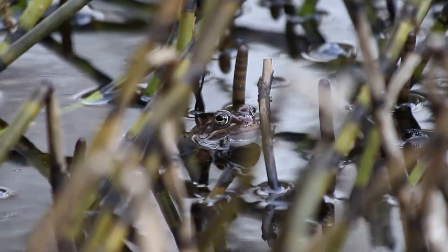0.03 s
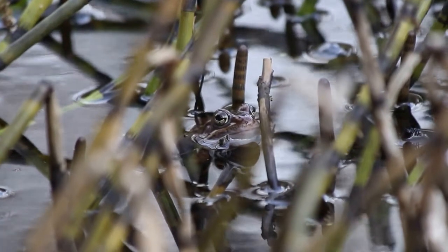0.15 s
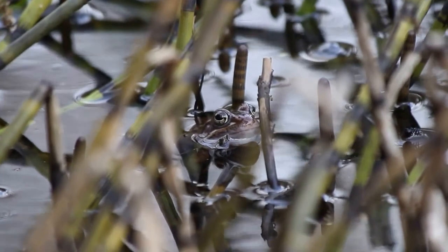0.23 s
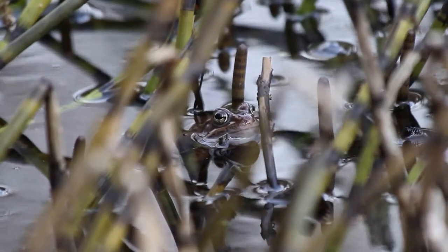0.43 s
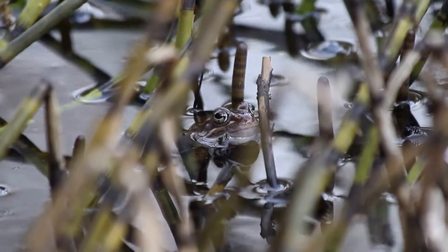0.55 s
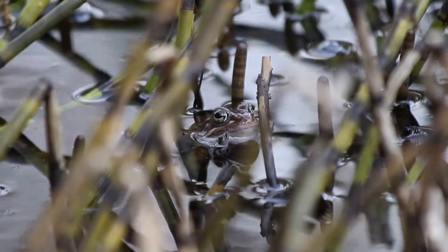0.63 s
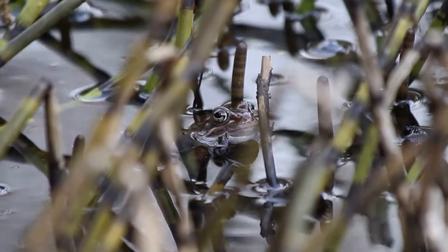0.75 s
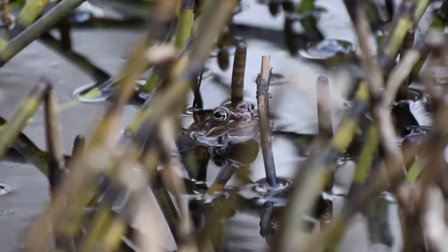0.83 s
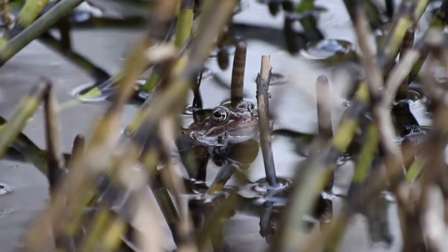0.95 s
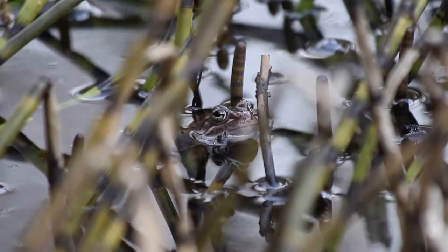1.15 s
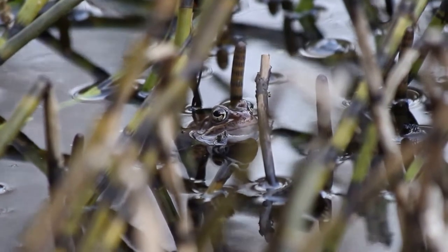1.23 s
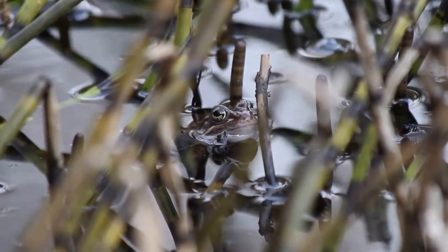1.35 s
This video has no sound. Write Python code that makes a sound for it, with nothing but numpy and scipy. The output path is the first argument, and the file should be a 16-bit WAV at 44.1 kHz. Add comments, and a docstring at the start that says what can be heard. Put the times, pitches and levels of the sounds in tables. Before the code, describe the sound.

Faint camera motor ticks, irregular and dry, over dull outdoor hush with one brief wind thump

```python
"""A small motor in a camera beside a still pond steps with faint, nearly identical ticks: each impulse sets
the same damped casing modes ringing, and weak random jolts ring them between steps. Under it lie a dull
outdoor wash of noise shaped by a spectral curve and casing resonances, and a very high steady sine whine.
Wind on the microphone is low band noise with separate thumps, each a pulse of about one cycle; two thin high
ticks are single damped tones, and faint far chirps, likely a bird, are short falling sines."""
import sys
import numpy as np
from scipy import signal
from scipy.fft import rfft, irfft
from scipy.io import wavfile
from scipy.ndimage import uniform_filter1d

SR = 44100
rng = np.random.default_rng(int(sys.argv[2]) if len(sys.argv) > 2 else 0)


def int16_out(signal):
    """Quantize to a 16-bit WAV file."""
    q = np.round(np.clip(np.atleast_2d(signal).T, -1, 1) * 32767)
    wavfile.write(sys.argv[1], SR, q.astype(np.int16))


def invert_db(level):
    """Linear amplitude ratio for a level in decibels (20 dB per decade), elementwise."""
    return 10 ** (np.asarray(level, dtype=float) / 20)


N = 61739  # length in samples


def rms_one(x):
    """Normalization: scales a signal to unit root-mean-square."""
    return x / np.sqrt(np.mean(x ** 2) + 1e-20)


def drift(rate_hz):
    """Low-pass random process: white noise through a double real pole gives a slow wander of rms 1."""
    pole = np.exp(-2 * np.pi * rate_hz / SR)
    white = rng.standard_normal(N + SR // 2)
    settled = signal.lfilter([1], [1, -2 * pole, pole * pole], white)[SR // 2:]
    return rms_one(settled)


def ring(hz, t60_s, swell_s):
    """Damped mode: a sine that swells with one time constant and decays by 60 dB in t60_s."""
    t = np.arange(SR // 10) / SR
    swell = (1 - np.exp(-t / max(swell_s, 1e-5))) ** 2
    decay = invert_db(-60 * t / t60_s)
    return swell * decay * np.sin(2 * np.pi * hz * t)


def add(out, start_s, sound):
    """Superposition: adds a sound into the mix from its start time."""
    i = max(int(start_s * SR), 0)
    out[i:i + len(sound)] += sound[:N - i]


def casing_modes():
    """Modal synthesis: the casing's impulse response, one damped tone per row."""
    # modes of the casing under a tick: pitch_hz, level_db (relative), t60_s, swell_s
    mode_table = [(1146, -9.5, 0.035, 0.0024), (1350, -13, .04, 0.00059), (2071, -9.5, 0.03, 0.0014),
                  (2466, 0, 0.011, 0.00034), (2786, 0, 0.019, 0.00073), (3430, -2, 0.017, 0.00088),
                  (4016, -12, 0.023, 0.00019), (4483, -14.5, 0.018, 0.00026), (6050, 9.5, 0.0077, 0.0027),
                  (6835, 8.5, 0.0087, .003), (7970, -27, 0.013, 0.00024), (9200, -23.5, 0.013, 0.00033),
                  (10800, -23.5, 0.0095, .0003), (12050, -20, 0.0096, .0003), (12450, -23, 0.013, .0003),
                  (13700, -29, 0.0088, .0002), (5380, -23.5, 0.02, 0.00028), (7600, -29.5, 0.0094, .0002)]
    return np.array([invert_db(level_db) * ring(hz, t60_s, swell_s) for hz, level_db, t60_s, swell_s in mode_table])


def wash():
    """Spectral shaping: white noise filtered to a curve plus resonances, its level flickering a little."""
    level_db, flicker_db, flicker_hz = -58, 1.14, 40
    # spectrum under the resonances, with a narrow gap near 14.8 kHz: pitch_hz, density_db (relative, per Hz)
    spectral_curve = np.array([(30, -3.5), (150, -17.5), (260, -20), (600, -8.5), (850, -16.5),
                               (1800, -30.5), (4600, -32.5), (5100, -36), (7300, -42.5), (10000, -45),
                               (14431, -46), (14520, -61), (15120, -63), (15161, -33.5), (15500, -44),
                               (15801, -33), (15880, -85.5)])
    # resonances of the casing: pitch_hz, width_hz, density_db (relative, per Hz)
    resonances = [(355, 99.5, 0), (423, 59, -1.5), (470, 83, -3), (737, 63, -6), (1169, 80, -16.5),
                  (1398, 338, -12.5), (2155, 160, -20), (2439, 203, -14), (2670, 254, -12.5),
                  (3140, 64, -16), (3454, 270, -18.5), (3763, 100, -22.5), (4370, 220, -31),
                  (6260, 690, -33.5), (6710, 200, -38.5), (9370, 120, -43), (11200, 233, -46.5),
                  (12200, 310, -38.5), (12700, 310, -40), (14250, 300, -44)]
    hz = np.arange(1, N // 2 + 2) * SR / N
    curve_db = np.interp(np.log(hz), np.log(spectral_curve[:, 0]), spectral_curve[:, 1])
    power = invert_db(2 * curve_db)
    for centre_hz, width_hz, density_db in resonances:
        detuning = 2 * (hz - centre_hz) / width_hz
        power = power + invert_db(2 * density_db) / (1 + detuning ** 2) ** 2
    noise = irfft(rfft(rng.standard_normal(N)) * np.sqrt(power), N)
    return invert_db(level_db + flicker_db * drift(flicker_hz)) * rms_one(noise)


def whine():
    """Steady oscillation: an electrical whine near the top of hearing is a pure sine."""
    # tones of the whine: pitch_hz, level_db (rms)
    tones = [(15634.8, -64.8)]
    t = np.arange(N) / SR
    return sum(invert_db(level_db) * np.sqrt(2) * np.sin(2 * np.pi * hz * t) for hz, level_db in tones)


def band_noise(white, low_hz, top_hz):
    """Band limitation: passes noise between two edges, drops the filter's settling and sets rms 1."""
    band = signal.butter(2, [low_hz, top_hz], "band", fs=SR, output="sos")
    return rms_one(signal.sosfilt(band, white)[SR // 2:])


def wind():
    """Wind noise at the microphone: low noise of evened level whose band widens as it grows stronger."""
    low_hz, calm_top_hz, top_hz_per_db = 41.8, 90, 4.0
    even_samples = int(.05 * SR)
    # level of the wind ahead of the final low-pass: time_s, level_db
    level_curve = [(0, -61), (.042, -61), (.092, -72), (.15, -59.5), (.21, -45), (.25, -34), (.35, -59),
                   (.375, -52), (.392, -63.5), (.49, -56.5), (.56, -73), (.7, -58.5), (.758, -60.5),
                   (.786, -68), (.876, -61), (.96, -62.5), (1.03, -60), (1.09, -70), (1.19, -61),
                   (1.28, -56.5), (1.342, -72), (1.4, -70)]
    level_db = np.interp(np.arange(N) / SR, *np.transpose(level_curve))
    range_db = level_db.max() - level_db.min()
    strength = (level_db - level_db.min()) / range_db
    calm_hz, strong_hz = np.clip(calm_top_hz + top_hz_per_db * np.array([0, range_db]), 60, 2000)
    # both bands filter the same noise, so they crossfade coherently
    white = rng.standard_normal(N + SR // 2)
    dull = band_noise(white, low_hz, calm_hz)
    bright = band_noise(white, low_hz, strong_hz)
    low = (1 - strength) * dull + strength * bright
    # dividing by the running level removes most of the noise's own swells
    running_power = uniform_filter1d(uniform_filter1d(low ** 2, even_samples), even_samples)
    even = low / np.sqrt(running_power + 0.016)
    return signal.sosfilt(signal.butter(2, 180, fs=SR, output="sos"), invert_db(level_db) * even)


def chatter():
    """Random impulse excitation: weak motor jolts of either sign ring the casing between steps."""
    jolts_per_s, level_db, spread_db = 140, -69, 2.0
    happens = rng.random(N) < jolts_per_s / SR
    strength = invert_db(level_db + spread_db * rng.standard_normal(N))
    jolts = happens * strength * rng.choice([-1, 1], N)
    return signal.fftconvolve(jolts, casing_modes().sum(axis=0))[:N]


def ticks():
    """Impulsive modal excitation: every motor step rings the same casing modes, nearly alike each time."""
    level_db, spread_db = -49, 1.0
    # motor steps: start_s
    step_times = [.0203, .0252, .0580, .0631, .1110, .1491, .1970, .3257, .5733, .5784, .6690, .7449, .7581,
                  .9670, 1.0049, 1.0428, 1.1666, 1.2624]
    modes = casing_modes()
    for_each_mode = rng.standard_normal((len(step_times), len(modes)))
    out = np.zeros(N)
    for start_s, chance in zip(step_times, for_each_mode):
        add(out, start_s, invert_db(level_db + spread_db * chance) @ modes)
    return out


def thumps():
    """Pressure pulses: each puff of air on the microphone is a short cosine under a Gaussian envelope."""
    # puffs of air: centre_s, level_db (envelope peak before the low cut), pitch_hz, length_cycles
    puffs = [(0.141, -56, 96.5, 1.9), (.189, -46.5, 90, 2.1), (0.2233, -22.5, 121.4, 0.45),
             (.222, -38, 335, 0.96), (0.2367, -35, 168, 1.5), (.243, -27.5, 334, 0.85),
             (0.2466, -21.5, 140, .9), (.251, -30.5, 232, 0.89), (.2405, -51, 565, 0.92),
             (0.2503, -43, 630, 1.53), (.261, -36.5, 81, 1), (.276, -36, 210, 1.23), (.286, -25, 92, 0.52),
             (0.3, -39, 106.4, 2.4), (0.3244, -23.5, 135.6, 0.91), (.331, -34, 188, .8),
             (.345, -40, 75, 0.74), (0.3606, -39.5, 374, 1.87), (0.36, -25, 163, 0.82),
             (0.367, -33.5, 77, 1.0), (0.753, -52.5, 90, 1.7), (0.904, -45, 71.4, 0.49), (1.0, -48, 132, 1),
             (1.024, -50, 55.6, 1.0), (1.253, -52.5, 125, 1.2)]
    t = np.arange(N) / SR
    out = np.zeros(N)
    for centre_s, level_db, hz, length_cycles in puffs:
        turns = (t - centre_s) * hz
        envelope = np.exp(-(2 * turns / length_cycles) ** 2 / 2)
        out += invert_db(level_db) * envelope * np.cos(2 * np.pi * turns - np.pi / 4)
    return out


def low_cut(x):
    """High-pass filtering: weakens what lies below 35 Hz."""
    return signal.sosfilt(signal.butter(2, 35.0, "high", fs=SR, output="sos"), x)


def pinpricks():
    """Single-mode ringing: a thin high tick is one fast-decaying tone."""
    # thin high ticks: start_s, level_db (before swell and decay), pitch_hz
    high_ticks = [(0.3721, -67, 12500), (0.9656, -57, 13300)]
    out = np.zeros(N)
    for start_s, level_db, hz in high_ticks:
        add(out, start_s, invert_db(level_db) * ring(hz, t60_s=0.0088, swell_s=.0001))
    return out


def chirps():
    """Linear frequency modulation: soft falling whistles, their level fluttering from the air on the way."""
    fall_hz_per_s, flutter_db, flutter_hz = 8000, 4.0, 150
    # far chirps, likely a bird: centre_s, level_db (before flutter), pitch_hz (at centre), length_s
    whistles = [(.433, -79, 6200, .016), (.484, -80, 5950, .012), (.517, -78, 5850, .012),
                (1.353, -80, 6400, .009), (1.365, -79, 5750, .009), (1.379, -79, 5600, .011)]
    out = np.zeros(N)
    for centre_s, level_db, hz, length_s in whistles:
        t = np.arange(N) / SR - centre_s
        envelope = np.exp(-(2 * t / length_s) ** 2)
        # half the slope: phase is the integral of the falling pitch
        phase = 2 * np.pi * (hz - fall_hz_per_s * t / 2) * t
        out += invert_db(level_db) * envelope * np.sin(phase)
    return invert_db(flutter_db * drift(flutter_hz)) * out


def scene():
    """Linear superposition: all sources sum into one channel."""
    air = low_cut(wind() + thumps())
    motor = chatter() + ticks() + pinpricks()
    return (wash() + whine() + air + motor + chirps())[None]


def low_pass(x):
    """Removes everything above the highest recorded frequency."""
    return signal.sosfilt(signal.butter(12, 16560, fs=SR, output="sos"), x)


def record(dry):
    """Signal chain: the summed sources pass through the last stage."""
    return low_pass(dry)


dry = scene()
out = record(dry)
int16_out(out)
```